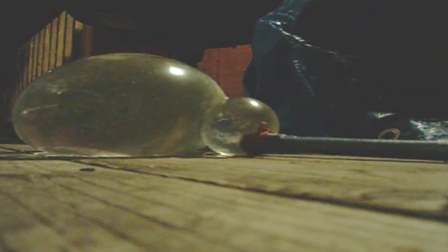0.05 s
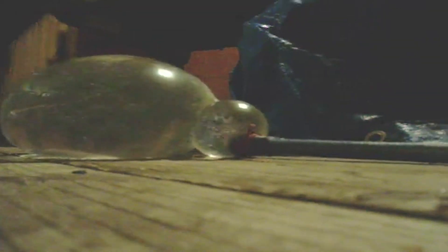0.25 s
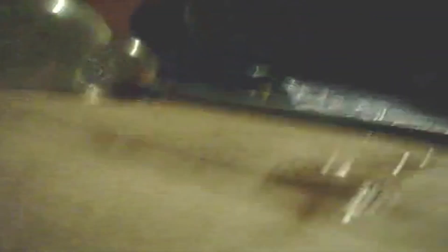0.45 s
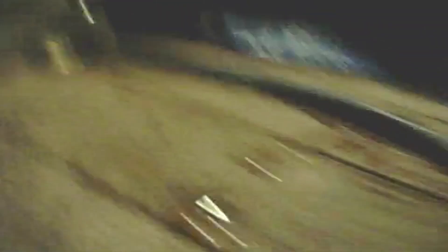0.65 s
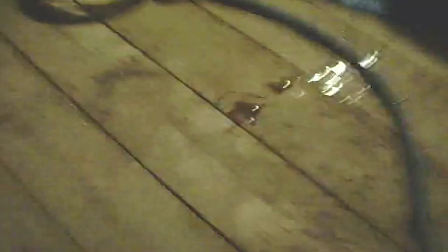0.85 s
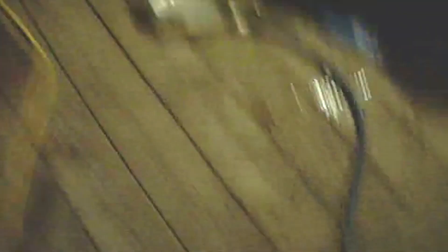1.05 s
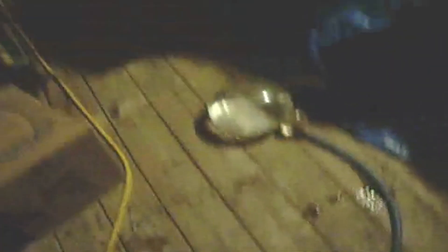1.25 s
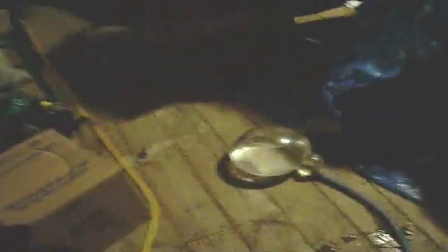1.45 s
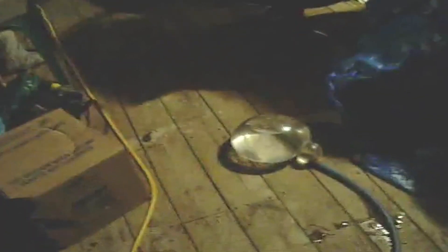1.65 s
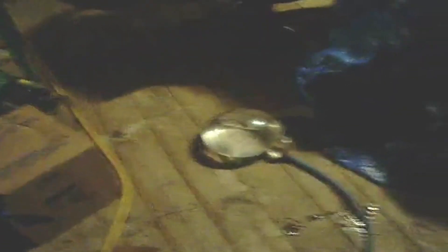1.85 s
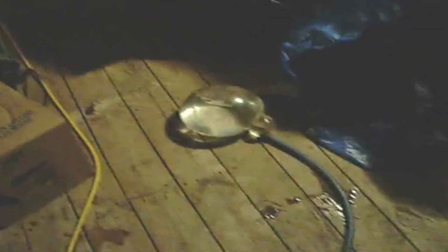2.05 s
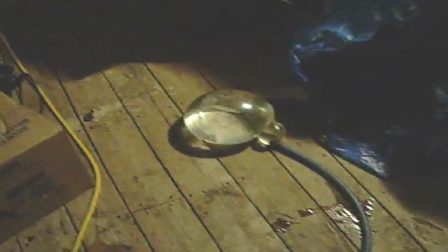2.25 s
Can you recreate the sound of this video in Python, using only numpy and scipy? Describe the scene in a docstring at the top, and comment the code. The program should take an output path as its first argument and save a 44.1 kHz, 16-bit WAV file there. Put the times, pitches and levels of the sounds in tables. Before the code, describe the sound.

A small camera is picked up, knocking and rustling, while hose water hisses softly behind.

```python
"""Water balloon and a handled camera

Water hisses steadily through a hose into a swelling balloon on a wooden floor, with small plinks.
The microphone sits in a small camera that is picked up from the boards and carried, so the handling
is very close: bumps, fingers rubbing and squeaking on the plastic, clicks of the case. The hardest
knocks overload the microphone, and coarse, stepped sampling gives everything a glassy treble."""
import sys
import numpy as np
from scipy import signal
from scipy.fft import rfft, irfft, next_fast_len
from scipy.io import wavfile
from scipy.ndimage import map_coordinates

SR = 44100
rng = np.random.default_rng(int(sys.argv[2]) if len(sys.argv) > 2 else 0)


def master_out(mix):
    """Clip the mix to full scale and print it as 16-bit PCM to the path in sys.argv[1]."""
    frames = np.transpose(np.atleast_2d(mix))
    ceiling = np.clip(frames, -1, 1)
    pcm = np.round(ceiling * 32767).astype(np.int16)
    wavfile.write(sys.argv[1], SR, pcm)


N = 101429

# How hard the fingers rub. Each row: time in seconds, level in dB.
RUB_LEVEL = [(0, -38.5), (.05, -42.5), (.08, -41), (.14, -36), (.175, -39.5), (.235, -32.5), (.275, -25),
             (.31, -27), (.36, -33.5), (.378, -25.5), (.43, -23.5), (.46, -32.5), (.49, -40), (.6, -40),
             (.675, -38), (.725, -30.5), (.765, -42), (.86, -46), (.995, -39), (1.04, -52), (1.38, -83),
             (1.41, -32), (1.45, -55), (1.69, -47.5), (1.74, -32.5), (1.78, -38.5), (1.85, -52),
             (1.87, -30.5), (1.93, -40), (2.03, -38), (2.08, -49), (2.24, -45), (2.3, -36)]
# Colour of the plastic case. Each row: frequency in Hz, relative level in dB.
CASE_COLOUR = [(80, -8), (400, -11.5), (1000, -6), (2000, 2), (3100, 1)]


def amp(db):
    """Decibels to gain."""
    return 10 ** (np.asarray(db) / 20)


def unit(x):
    """Scale to rms 1."""
    return x / np.sqrt(np.mean(x ** 2) + 1e-20)


def along(points, hz):
    """Read (Hz, dB) points at hz, on a log frequency axis."""
    f, db = np.transpose(points)
    return np.interp(np.log(hz + 1), np.log(np.sort(f) + 1), db)


def curve(rows):
    """One value per sample from (seconds, value) rows."""
    return np.interp(np.arange(N) / SR, *np.transpose(rows))


def wobble(rate):
    """A smooth random curve, rate knots a second."""
    knots = rng.standard_normal(int(N * rate / SR) + 4)
    return map_coordinates(knots, [np.arange(N) * rate / SR])


def impulses(per_second):
    """Randomly timed spikes of either sign."""
    return (rng.random(N) < per_second / SR) * rng.choice([-1, 1], N)


def resonance(f, hz, octaves):
    """A spectral hump of height 1 around hz."""
    return 1 / (1 + (np.log2((f + 1) / hz) / octaves) ** 2)


def case_db(f, hz):
    """Colour of the case in dB, with a resonance at hz."""
    return along(CASE_COLOUR, f) + 6.5 * resonance(f, hz, octaves=0.2)


def coloured(x, db_at, band_hz=4300):
    """Causal filter with the given dB at each frequency, inside the microphone's band."""
    size = 2 * next_fast_len(len(x) // 2 + SR // 10)
    f = np.fft.rfftfreq(size, 1 / SR)
    band = 1 / (1 + (f / band_hz) ** 20) ** .5
    cepstrum = irfft(np.log(band * amp(db_at(f))), size)
    cepstrum[1:size // 2] *= 2  # fold onto positive time: minimum phase
    cepstrum[size // 2 + 1:] = 0
    return irfft(rfft(x, size) * np.exp(rfft(cepstrum)), size)[:len(x)]


def burst(t60, db_at):
    """Coloured dying noise that starts near rms 1."""
    decay = 1000.0 ** (-np.arange(SR // 5) / SR / t60)
    noise = coloured(decay * rng.choice([-1, 1], len(decay)), db_at)
    return noise * np.linalg.norm(decay) / np.linalg.norm(noise)


def ring(hz, t60):
    """One mode, dying by 60 dB in t60 seconds."""
    t = np.arange(SR // 5) / SR
    return np.sin(2 * np.pi * hz * t) * np.exp(-np.log(1000) * t / t60)


def add(track, start, x):
    """Mix x into the track from start, in seconds."""
    part = track[max(round(start * SR), 0):][:len(x)]
    part += x[:len(part)]


def water(flutter_db=0.85):
    """Turbulent flow in the hose fitting hisses behind the handling."""
    # Colour of the hiss. Each row: frequency in Hz, relative level in dB.
    hiss_colour = [(60, -18), (600, -9.5), (1500, -12.5), (2100, -11.5), (2450, 1), (2700, -4), (2920, 5),
                   (3100, -3.5), (3400, -7.5), (3900, -19.5)]
    # Hiss at the microphone. Each row: time in seconds, level in dB.
    hiss_level = [(0, -37), (.5, -40), (.9, -40.5), (1.2, -38.5), (1.7, -37.5), (2.3, -39)]
    hiss = unit(coloured(rng.standard_normal(N), lambda f: along(hiss_colour, f)))
    return hiss * amp(curve(hiss_level) + flutter_db * wobble(40.13))


def plinks(splash_db=-13.5):
    """Small wet plinks, like drips or bubbles: each a quickly dying tone over a splash of noise."""
    # Each row: start in seconds, level in dB, pitch in Hz, t60 in seconds.
    drips = [(0.0231, -22.5, 2650, 0.014), (0.032, -26, 3460, 0.029), (.055, -18.5, 2200, 0.032),
             (0.0582, -19, 3650, 0.015), (.1015, -23, 1517, 0.046), (.129, -14.5, 2940, 0.031),
             (0.146, -21.5, 2190, 0.034), (.2105, -21, 2730, .04), (0.364, -15, 2340, .014),
             (0.5225, -29, 1070, 0.042), (.532, -30, 3420, 0.013), (.5976, -26, 3800, 0.03),
             (0.6329, -12.5, 3390, 0.021), (.6338, -20.5, 3800, 0.022), (.793, -23, 2486, 0.027),
             (0.894, -27, 3340, 0.0077), (.908, -34, 3550, 0.037), (1.2428, -27, 2623, 0.058),
             (2.0127, -9.5, 3460, 0.019), (2.0175, -18.5, 3760, 0.025), (2.022, -21, 3055, 0.042)]
    out = np.zeros(N)
    for start, db, hz, t60 in drips:
        splash = amp(splash_db) * burst(t60, lambda f: case_db(f, hz))
        add(out, start, amp(db) * (ring(hz, t60) + splash))
    return out


def sway():
    """The carrying hand moves the microphone and makes a low rumble."""
    # Colour of the rumble. Each row: frequency in Hz, relative level in dB.
    rumble_colour = [(5, 8.5), (12, 10), (25, -6.5), (45, -10.5), (80, -14.5), (150, -22.5), (400, -43),
                     (1500, -63)]
    # Strength of the rumble. Each row: time in seconds, level in dB.
    rumble_level = [(0, -30.5), (.2, -41.5), (.32, -28.5), (.5, -23.5), (.72, -27.5), (.82, -30),
                    (1.02, -23.5), (1.12, -33), (1.25, -35), (1.4, -34), (1.68, -36), (1.95, -29.5),
                    (2.15, -35.5), (2.3, -31.5)]
    rumble = unit(coloured(rng.standard_normal(N), lambda f: along(rumble_colour, f)))
    return rumble * amp(curve(rumble_level))


def thuds():
    """Soft thuds: the camera wobbles in the hand for a few slow cycles."""
    # Each row: start in seconds, level in dB, pitch in Hz, t60 in seconds.
    hand_thuds = [(.812, -22.5, 74.4, 0.075), (1.0105, -27.5, 103, 0.098), (1.183, -29, 65.4, .05),
                  (1.234, -26, 48, 0.065)]
    out = np.zeros(N)
    for start, db, hz, t60 in hand_thuds:
        add(out, start, amp(db) * ring(hz, t60))
    return out


def crackle(level_db=-46.5, spread_db=12, low_cut_db=18, low_cut_hz=1920, follows_rub=0.37):
    """Sparse thin ticks of the case, stronger when the fingers rub harder."""
    ticks = impulses(per_second=170) * amp(spread_db * rng.random(N))
    colour = lambda f: along(CASE_COLOUR, f) - low_cut_db / (1 + (f / low_cut_hz) ** 10)
    rub_db = curve(RUB_LEVEL)
    return unit(coloured(ticks, colour)) * amp(level_db + follows_rub * (rub_db - rub_db.mean()))


def rubbing(grip_db=2, spread_db=2.5, smooth_gain=0.58):
    """Fingers slip over the case in dense tiny catches, right by the microphone."""
    # Colour of the friction. Each row: frequency in Hz, relative level in dB.
    rub_colour = [(100, -24.5), (400, -4), (800, -11), (1500, 0), (2600, -1.5), (3500, 1.5)]
    catches = impulses(per_second=1400) * amp(spread_db * np.clip(rng.standard_normal(N), -2, 2))
    friction = unit(catches) + smooth_gain * rng.standard_normal(N)
    rub = coloured(friction, lambda f: along(rub_colour, f))
    grip = amp(grip_db * wobble(130))
    return unit(rub * grip) * amp(curve(RUB_LEVEL))


def squeaks(jitter=0.09, rasp_db=4.5):
    """Skin sticks and slips on the plastic fast enough to make short, raspy chirps."""
    # Each row: start and length in seconds, level in dB, first and last pitch in Hz.
    chirps = [(0.311, 0.012, -23, 1730, 1690), (0.618, 0.007, -27.5, 2000, 2100),
              (0.819, 0.014, -28.5, 887, 945), (0.832, 0.0093, -23, 1070, 1280),
              (0.8412, 0.0068, -23, 1350, 1360), (1.734, 0.016, -23.5, 1402, 1530),
              (2.287, 0.015, -26.5, 870, 1130)]
    out = np.zeros(N)
    for start, length, db, first_hz, last_hz in chirps:
        n = int(length * SR)
        hz = np.linspace(first_hz, last_hz, n) * (1 + jitter * wobble(1020)[:n])
        phase = 2 * np.pi * np.cumsum(hz) / SR
        rasp = unit(amp(rasp_db * wobble(643)[:n]))
        add(out, start, amp(db) * signal.windows.tukey(n, .5) * rasp * np.sin(phase))
    return out


def bumps(tone_db=-1, ring_db=5):
    """A bump shoves the microphone to and fro and knocks the hollow body, which rings briefly."""
    # Each row: time in seconds, push level in dB, push swing in seconds, knock level in dB,
    # knock t60 in seconds, knock pitch in Hz.
    impacts = [(0.2637, -8, 0.0045, -17.5, 0.22, 466.6), (0.4181, -17, 0.00079, -22, 0.13, 213),
               (.4580, -18.5, 0.013, -27, 0.12, 238), (0.6888, -24, 0.0014, -20.5, 0.031, 167),
               (0.855, -27, 0.0039, -39, 0.04, 120), (1.007, -24.5, 0.00084, -25.5, 0.024, 533),
               (1.017, -28, 0.0029, -35.5, 0.11, 233), (1.408, -54, .005, -33.5, 0.081, 397),
               (1.9556, -24, 0.01, -23, 0.028, 820), (1.9756, -33, 0.00039, -13.5, 0.017, 560)]
    # Colour of the camera's body. Each row: frequency in Hz, relative level in dB.
    body_colour = [(60, -2), (130, 5.5), (310, 5), (480, 1), (620, -3.5), (1200, -14), (2000, -3),
                   (5000, -73)]
    out = np.zeros(N)
    for time, push_db, swing, knock_db, t60, hz in impacts:
        swings = (np.arange(N) / SR - time) / swing
        out -= amp(push_db) * 4 * swings / (1 + swings ** 2) ** 2  # one push and pull
        knock = burst(t60, lambda f: along(body_colour, f) + ring_db * resonance(f, hz, octaves=0.21))
        add(out, time, amp(knock_db) * (knock + amp(tone_db) * ring(hz, t60)))
    return out


def clicks(level_db=-3, tone_db=-4, body_edge=0.72):
    """The case gives under the grip; each click rings around its own pitch, thin or full below it."""
    # Each row: start in seconds, relative level in dB, pitch in Hz, t60 in seconds,
    # boost or cut in dB below body_edge times the pitch.
    case_clicks = [(0.244, -13, 1170, 0.027, 12.5), (0.26, -4, 4330, 0.011, 9),
                   (0.2631, -1.5, 3000, 0.013, 0), (0.292, -11, 3420, 0.015, 11),
                   (0.3131, -9, 2480, 0.013, -9), (.4567, -11.5, 2370, 0.0083, 8),
                   (0.5683, -11, 3690, 0.013, 6), (0.6885, -8, 3150, 0.015, 5.5),
                   (0.697, -18, 2300, 0.034, 5.5), (0.8209, -4, 2420, 0.0046, -0.5),
                   (1.297, -19.5, 2350, 0.016, -59), (1.4036, -17.5, 3820, 0.0034, 13.5),
                   (1.7375, -23.5, 1720, 0.05, -3), (1.868, -12, 2780, 0.012, 4),
                   (1.9008, -14, 3570, 0.013, -8), (1.9081, -12, 3460, 0.01, -7),
                   (1.9511, -6.5, 2900, 0.013, -11.5), (1.9562, -4, 3260, 0.016, 1),
                   (1.9751, -21.5, 1870, 0.04, 8), (2.2767, -19.5, 2960, 0.0062, -9),
                   (2.2889, -24, 3980, 0.061, -7)]
    out = np.zeros(N)
    for start, db, hz, t60, body_db in case_clicks:
        colour = lambda f: case_db(f, hz) + body_db / (1 + (f / (body_edge * hz)) ** 10)
        click = burst(t60, colour) + amp(tone_db) * ring(hz, t60)
        add(out, start, amp(db + level_db) * click)
    return out


def snap(start=1.9563):
    """The hardest snap sets the whole hollow case ringing around the microphone."""
    # Modes of the case. Each row: pitch in Hz, level in dB, t60 in seconds.
    case_modes = [(1615, 0.5, 0.013), (1323, -13, 0.031)]
    out = np.zeros(N)
    for hz, db, t60 in case_modes:
        add(out, start, amp(db) * ring(hz, t60))
    return out


def scene():
    """Close handling noise over the steady flow, on one microphone."""
    background = water() + plinks()
    handling = rubbing() + crackle() + clicks() + snap() + bumps() + thuds() + squeaks() + sway()
    return (background + handling)[None]


def record(dry, hold_hz=8012.75, top_hz=15850):
    """The camera clips, samples slowly and holds each value: the steps mirror sound into the treble."""
    instants = np.floor(np.arange(N) * hold_hz / SR) * SR / hold_hz
    steps = np.clip(map_coordinates(dry[0], [instants]), -1, 1)
    size = next_fast_len(N + SR // 2)
    passband = np.fft.rfftfreq(size, 1 / SR) < top_hz
    return irfft(rfft(steps, size) * passband, size)[None, :N]


dry = scene()
out = record(dry)
master_out(out)
```